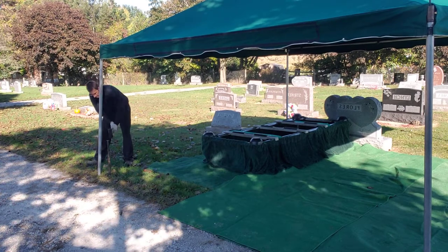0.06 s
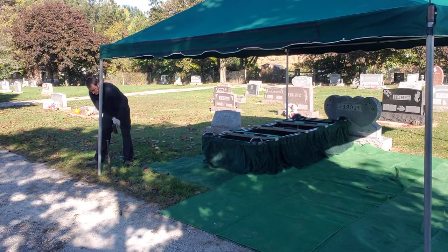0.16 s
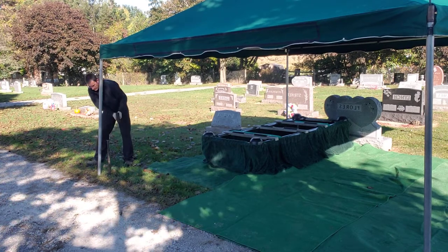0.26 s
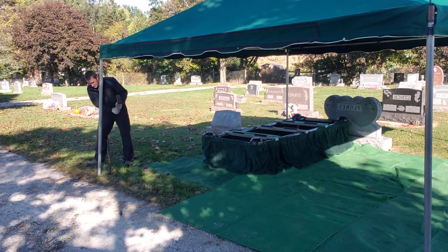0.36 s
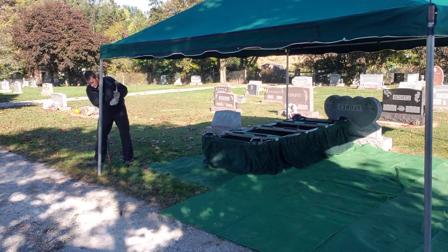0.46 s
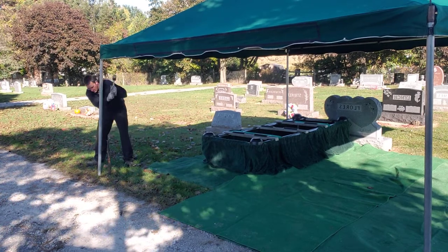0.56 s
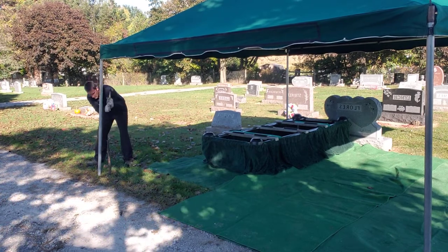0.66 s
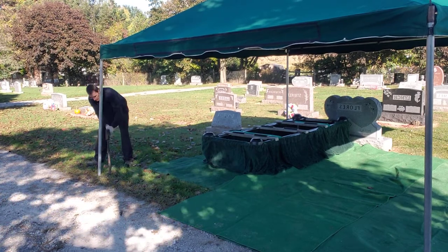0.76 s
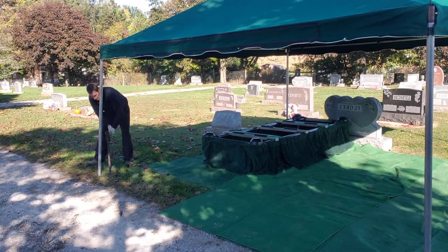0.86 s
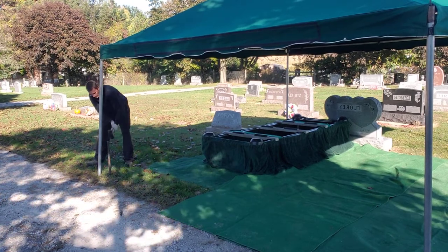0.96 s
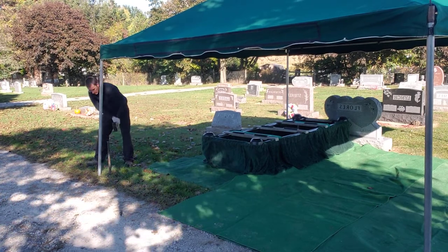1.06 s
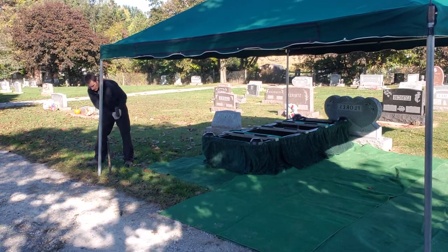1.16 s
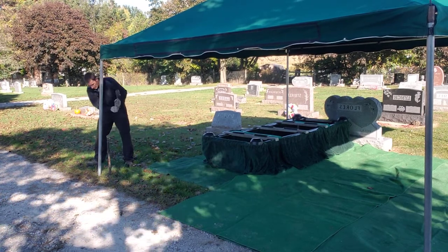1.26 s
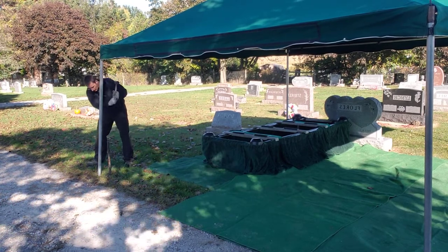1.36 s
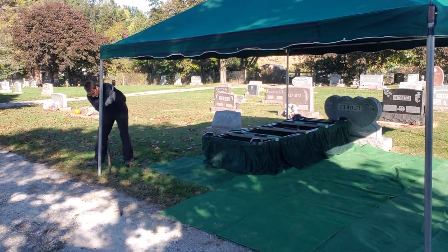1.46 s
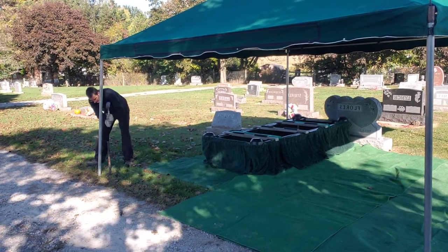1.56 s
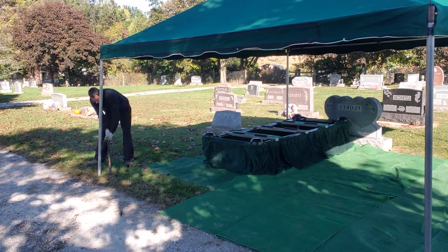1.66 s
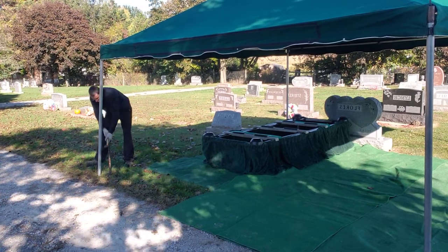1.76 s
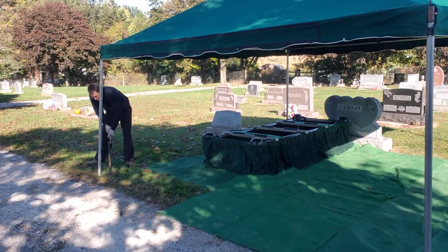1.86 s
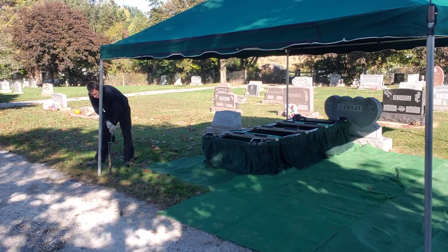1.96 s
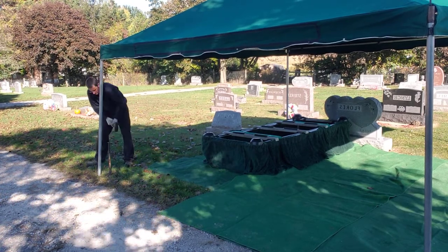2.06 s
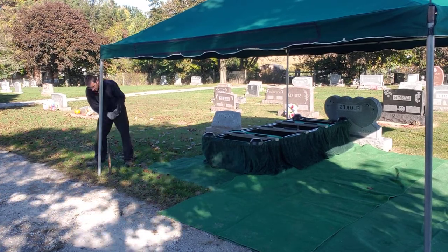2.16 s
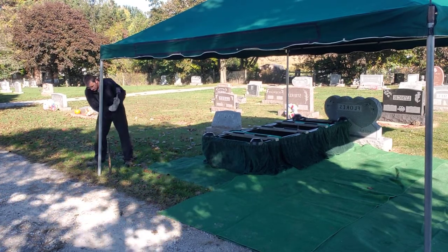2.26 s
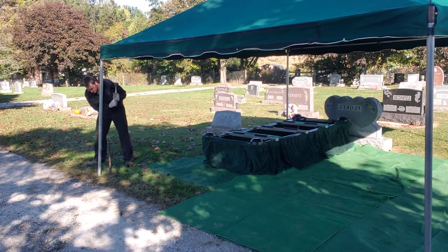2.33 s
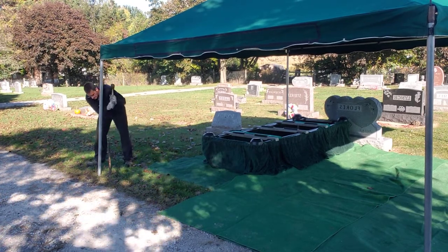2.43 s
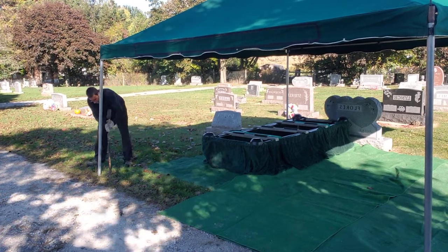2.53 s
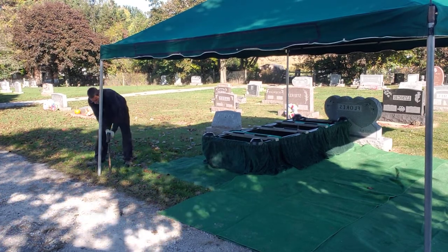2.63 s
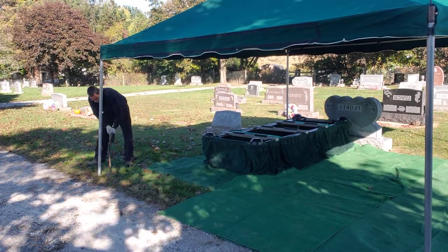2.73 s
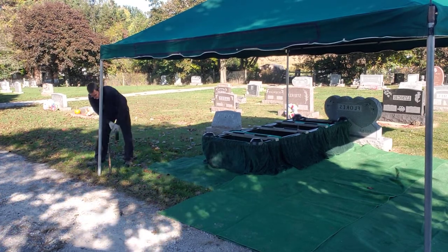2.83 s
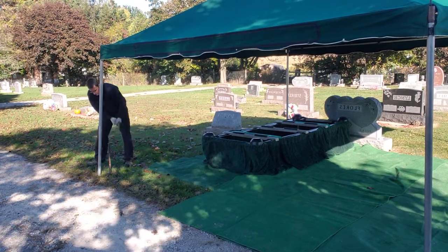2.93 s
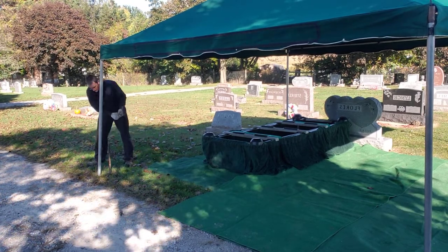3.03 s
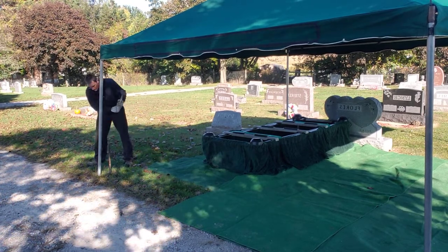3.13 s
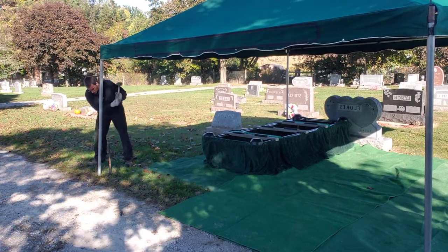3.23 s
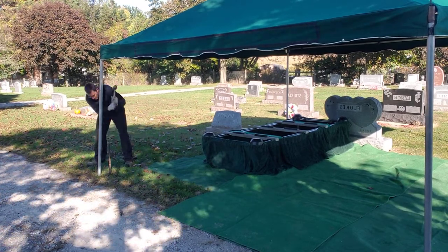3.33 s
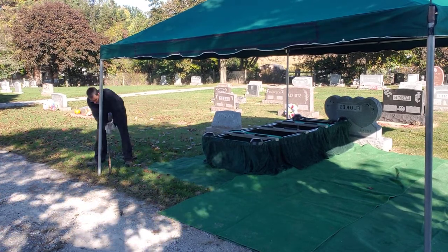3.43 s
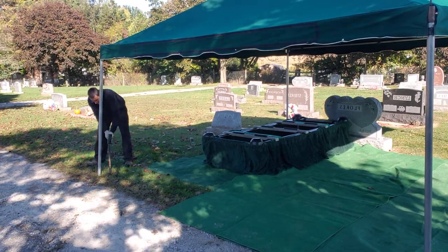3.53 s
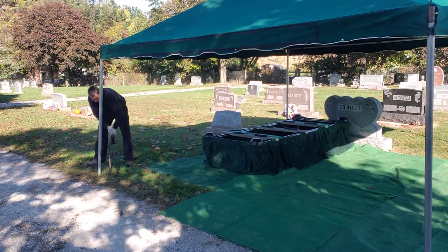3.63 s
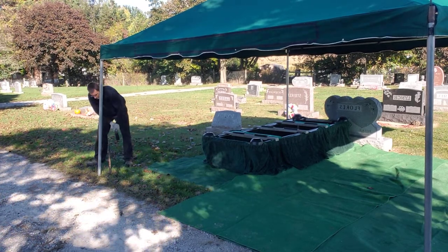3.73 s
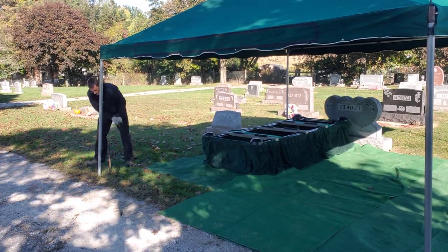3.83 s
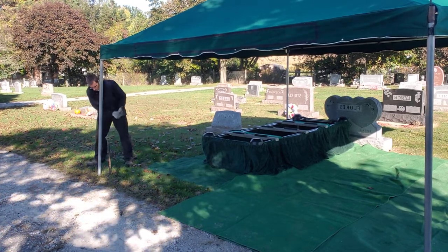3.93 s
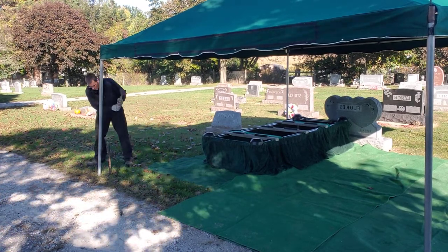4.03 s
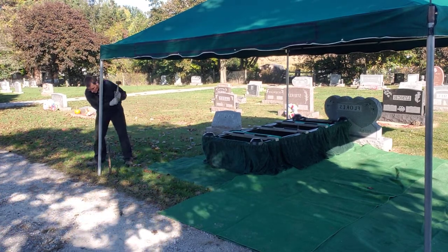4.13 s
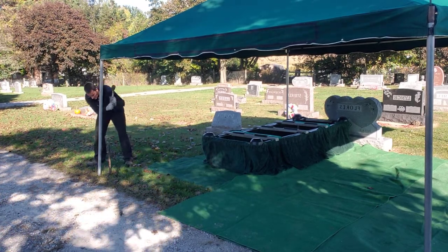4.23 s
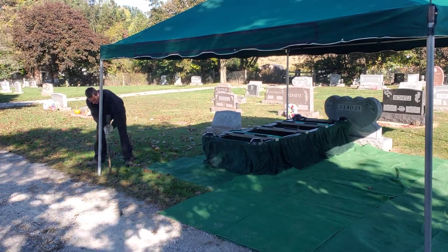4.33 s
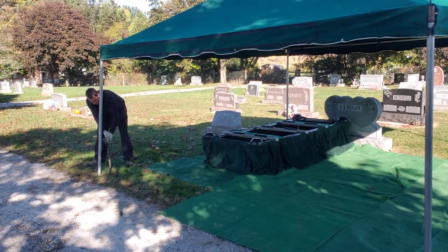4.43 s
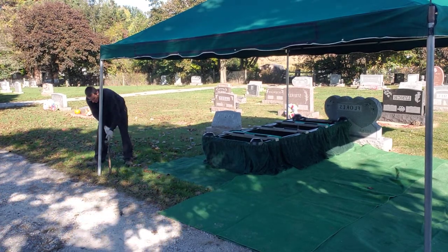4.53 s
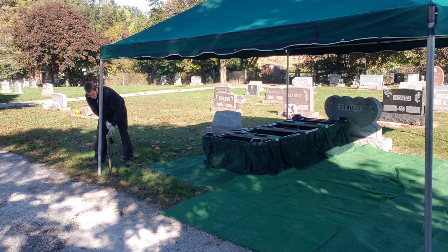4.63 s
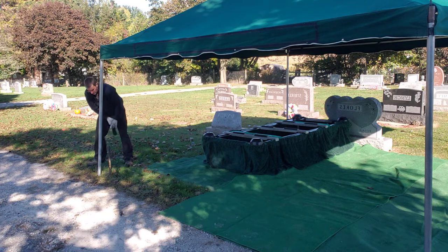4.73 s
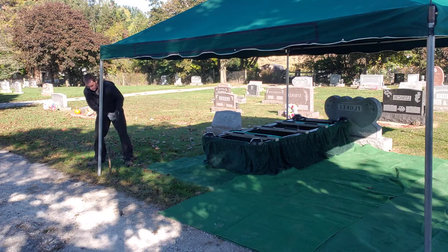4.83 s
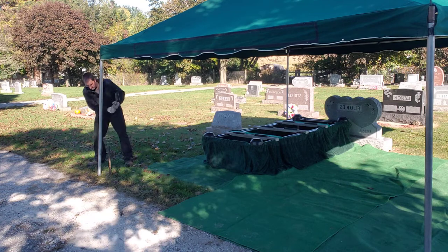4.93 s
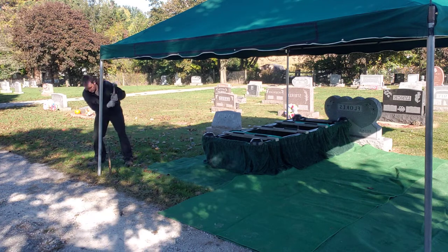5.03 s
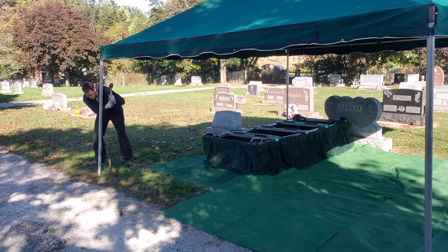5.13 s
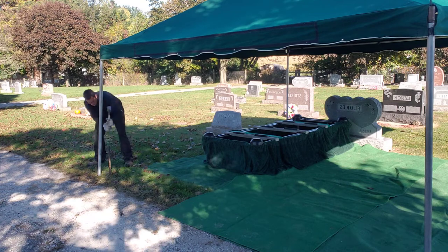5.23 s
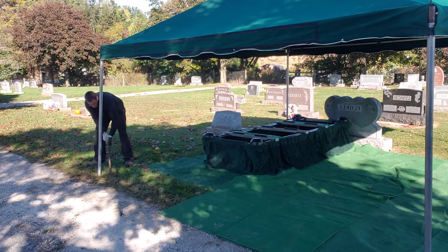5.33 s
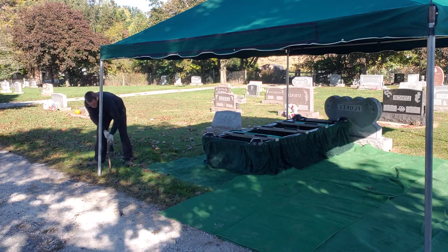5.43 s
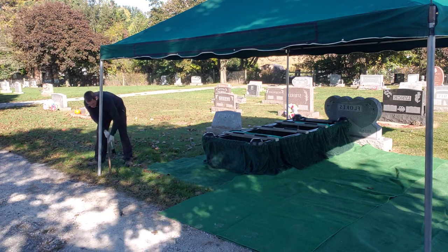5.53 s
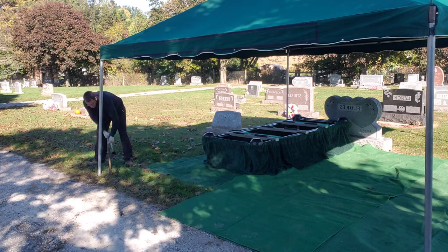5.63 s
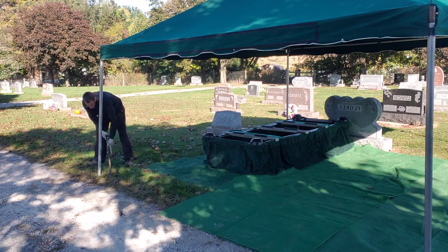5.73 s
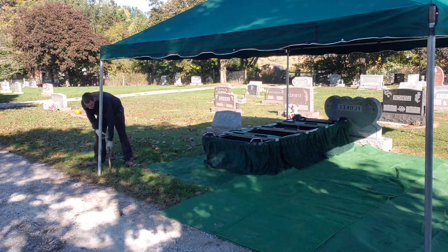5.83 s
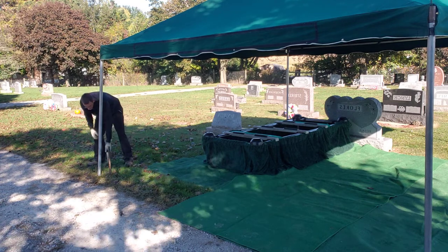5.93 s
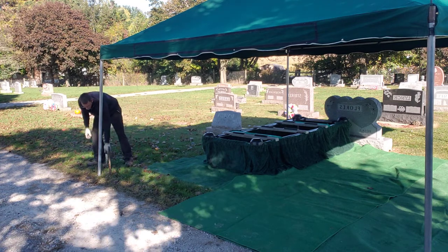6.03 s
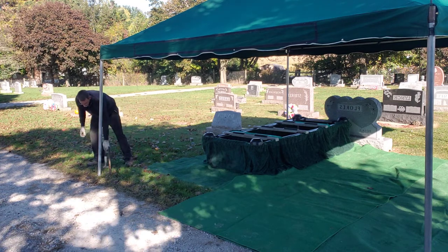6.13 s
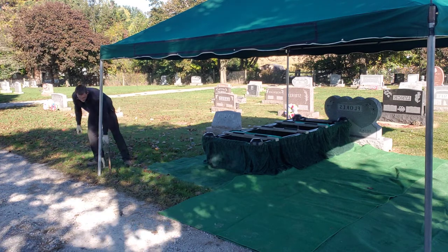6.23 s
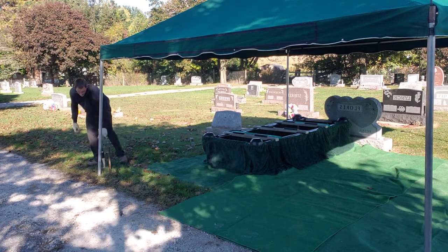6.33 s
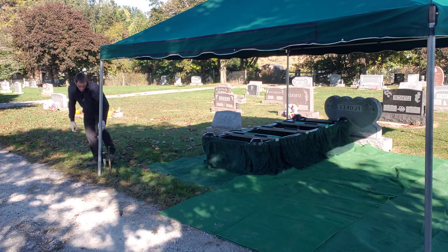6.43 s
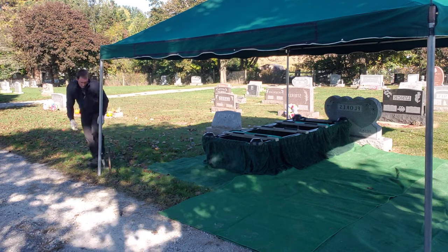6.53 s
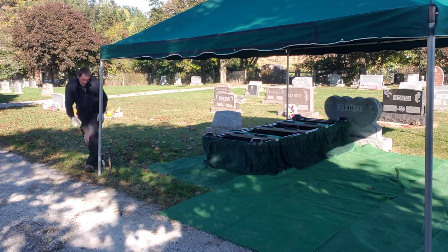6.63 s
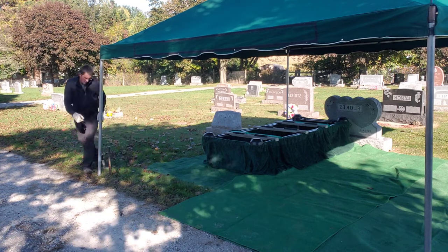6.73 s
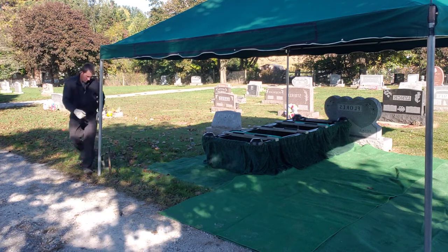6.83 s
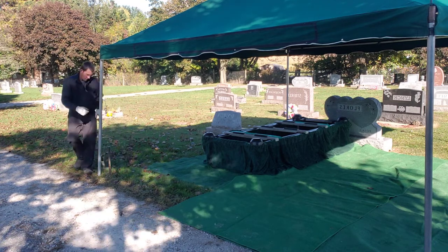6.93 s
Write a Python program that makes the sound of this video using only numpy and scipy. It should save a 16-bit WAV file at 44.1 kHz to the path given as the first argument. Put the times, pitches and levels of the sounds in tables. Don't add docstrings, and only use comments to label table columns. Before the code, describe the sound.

Steady hammer blows crack on a metal stake outdoors, each ringing briefly and echoing, while wind buffets the microphone with low rumbles.

```python
import sys
import numpy as np
from scipy import signal
from scipy.fft import rfft, irfft, next_fast_len
from scipy.io import wavfile
from scipy.ndimage import uniform_filter1d

SR = 44100
rng = np.random.default_rng(int(sys.argv[2]) if len(sys.argv) > 2 else 0)


def volts(x):
    e = np.asarray(x, float) / 20
    return 10 ** e


def pcm_store(signal):
    levels = np.round(np.clip(np.atleast_2d(signal), -1, 1) * 32767)
    wavfile.write(sys.argv[1], SR, levels.astype(np.int16).T)


N = 308242

# (frequency [Hz], level [dB])
CRACK_COLOUR = [(60, -12), (150, 6), (400, -12), (1000, 4.5), (2500, -6), (4500, -5.5), (7000, 3.5),
                (10000, -0.5), (14000, -17), (16500, -26)]
# (frequency [Hz], level [dB])
ECHO_RIGHT_COLOUR = [(60, 8), (150, 3.5), (400, -6), (900, 0.5), (2300, -4.5), (3200, -5), (4500, -0.5),
                     (6500, -4.5), (9500, -4.5), (13700, -2.5), (14500, -42), (16000, -67)]
FLUTTER_DB = 1.5


def unit(x):
    return x / np.sqrt(np.mean(x ** 2))


def noise(shape, size):
    hz, db = np.transpose(shape)
    fast = next_fast_len(size)
    log_hz = np.log(np.arange(1, fast // 2 + 2) * SR / fast)
    gain = volts(np.interp(log_hz, np.log(hz), db))
    white = rfft(rng.standard_normal(fast))
    return unit(irfft(white * gain, fast)[:size])


def walk(rate, size):
    hold = max(int(SR / rate), 1)
    steps = np.repeat(rng.standard_normal(size)[::hold], hold)
    return 1.14 * uniform_filter1d(uniform_filter1d(steps, hold), hold)[:size]


def fade(t, t60):
    return np.exp(-np.log(1000) * t / t60)


def ring(modes, t, scatter_db):
    total = 0
    for (hz, db, t60), (louder, sharper) in zip(modes, rng.standard_normal((len(modes), 2))):
        tone = np.sin(2 * np.pi * hz * (1 + 0.00316 * sharper) * t)
        total = total + volts(db + scatter_db * louder) * fade(t, t60) * tone
    return total


def band(x, lo_hz, hi_hz):
    return signal.sosfilt(signal.butter(2, (lo_hz, hi_hz), "band", fs=SR, output="sos"), x)


def add(out, s, sound):
    i = int(round(s * SR))
    part = sound[:, max(-i, 0):N - i]
    out[:, max(i, 0):max(i, 0) + part.shape[1]] += part


def scatter(t, colour, rise_s, hold_s, late_db):
    near = (1 - np.exp(-(t / rise_s) ** 2)) * fade(np.maximum(t - hold_s, 0), 0.24)
    far = volts(late_db) * fade(t, 0.61) * (t > rise_s)
    dull = [(hz, db - 1.1 * hz / 1000) for hz, db in colour]
    lumps = volts(1.7 * walk(220, len(t)))
    return lumps * (near * noise(colour, len(t)) + far * noise(dull, len(t)))


def hammer():
    # (time [s], straight to the right [dB], leak to the left [dB], echoes [dB], stake ring [dB])
    blows = [
        (-.03, -9, -40, -24, 3),
        (.845, -17, -17, -25, 0.5),
        (1.7, -20, -25, -27, -12),
        (2.653, -20.5, -32, -28, 3),
        (3.548, -20.5, -49, -29, 3.5),
        (4.443, -17.5, -42, -26.5, 3),
        (5.366, -19, -39, -26.5, 2.5),
    ]
    # (frequency [Hz], level [dB], decay t60 [s])
    stake_modes = [(2130, -18, .03), (2414, -14, 0.036), (2630, -16.5, .03), (3540, -12, 0.03),
                   (3590, 0, 0.045), (3655, 1, 0.045), (3800, -16, 0.02), (5160, -15.5, 0.02),
                   (6565, -13.5, 0.022), (7204, 1, 0.012), (9480, -7, .03), (10740, -4, .022),
                   (12200, -14, .015), (13500, -4, .02), (14280, -9, .015)]
    # (frequency [Hz], level [dB], decay t60 [s])
    stake_tail_modes = [(3581, -2, .5), (3625, -9, 1.1), (3655, 1, 1.05), (3700, -6, .35)]
    # (frequency [Hz], level [dB])
    echo_left_colour = [(80, -47), (250, -29.5), (600, -11.5), (1200, -10), (2300, 0), (2800, 1.5),
                        (3200, -13), (4500, 3.5), (5100, -5.5), (5700, -9), (6500, -0.5), (9500, -14),
                        (15000, -5), (15800, -52)]
    ground_modes = [(79.0, -14.0, 0.16), (116.0, -16, 0.078), (340, -17, 0.052)]  # Hz, dB, t60 s
    burst_s, left_lag_s = .0078, .004
    out, t = np.zeros((2, N)), np.arange(int(.6 * SR)) / SR
    for s, straight_db, leak_db, left_db, ring_db in blows:
        steel = volts(ring_db) * ring(stake_modes, t, scatter_db=FLUTTER_DB)
        crack = noise(CRACK_COLOUR, len(t)) * fade(t, 0.038) * np.minimum(t / 0.00083, 1)
        short_ring = steel * np.minimum(t / 0.0055, 1) * np.exp(-(t / burst_s) ** 4)
        thud = ring(ground_modes, t, scatter_db=FLUTTER_DB) * np.minimum(t / 0.0033, 1)
        straight = crack + volts(5.5) * short_ring + thud
        leak = ring([(9160, 0, .5)], t, scatter_db=0) * np.exp(-((t - .002) / .0012) ** 2)

        kick = volts(-23) * steel
        kick[0] += 1
        late_t = np.maximum(t - left_lag_s, 0)
        echo_left = scatter(late_t, echo_left_colour, 0.004, 0.023, -13.5)
        left = signal.fftconvolve(kick, echo_left)[:len(t)]
        kick[0] += volts(-2)
        echo_right = scatter(t, ECHO_RIGHT_COLOUR, 0.0044, 0.017, -18.0)
        right = signal.fftconvolve(kick, echo_right)[:len(t)]

        song = volts(ring_db - 27.0) * ring(stake_tail_modes, t, scatter_db=FLUTTER_DB) * np.minimum(t / 0.02, 1)
        right = volts(left_db - 14.5) * (right + song)
        left += volts(10) * np.roll(short_ring, int((left_lag_s + .002) * SR))
        left = volts(left_db) * (left + song) + volts(4.5) * band(right, 243, 1400)
        add(out, s, np.array([volts(leak_db) * leak + left, volts(straight_db) * straight + right]))
    return out


def gusts():
    # (start [s], hold [s], windward right [dB], sheltered left [dB])
    gust_list = [(-.1, .15, -31, -41.5), (0.39, 0.32, -32, -45), (1.05, 0.093, -41.5, -57.5),
                 (1.52, 0.032, -50.5, -76), (1.69, 0.086, -50, -72), (2.004, 0.18, -49.5, -84),
                 (3.55, 0.11, -53, -73), (4.15, 0.18, -56.5, -77), (4.976, 0.47, -45, -65.5),
                 (5.654, 0.24, -51, -68.5), (6.03, 0.23, -48.5, -78), (6.562, 0.59, -49, -71)]
    calm_db, rise_db_s, fall_db_s = (-62, -80), 176, 33.5
    t = np.arange(N) / SR
    db = np.array(calm_db)[:, None] + 0 * t
    for s, hold_s, *top_db in gust_list:
        rise_db = np.minimum(rise_db_s * (t - s), 0)
        fall_db = fall_db_s * np.maximum(t - s - hold_s, 0)
        db = np.maximum(db, np.array(top_db)[:, None] + rise_db - fall_db)
    return db


def wind():
    # (frequency [Hz], level [dB per Hz])
    rumble_colour = [(20, -34), (35, 3), (55, 7), (90, 0), (150, -15), (250, -41), (400, -32), (1500, -91)]
    # (frequency [Hz], level [dB per Hz])
    edge_colour = [(40, -39), (100, 2), (170, -2.5), (280, -13.5), (450, -23), (900, -32), (2500, -95)]
    # (time [s], level [dB], frequency [Hz])
    eddies = [(0.053, -23, 75), (0.224, -24, 61), (0.325, -24.5, 98), (.409, -16, 85), (0.445, -18.5, 89.5),
              (0.519, -16, 92), (0.59, -18.5, 80), (.674, -18, 89), (.708, -21, 72), (0.753, -19.5, 87),
              (0.816, -22.5, 89), (.935, -25.5, 84), (1.126, -30.5, 62), (1.179, -27.5, 79.5),
              (1.787, -31.5, 61.5), (2.023, -35, 62.6), (2.15, -34.5, 63.6), (2.21, -33, 67.6),
              (2.265, -30.5, 58.4), (4.228, -42, 61.6), (4.995, -29.5, 60.5), (5.034, -33, 70.6),
              (5.088, -35, 60), (5.119, -32.5, 77), (5.307, -33, 56), (5.849, -35, 66.5),
              (6.344, -36.5, 63.8), (6.668, -32.5, 63.6), (6.752, -43, 65), (6.851, -38, 65)]
    eddy_lee_db = -19
    out, level_db = np.zeros((2, N)), gusts()
    for side, rumble_db, edge_db in zip(out[::-1], level_db, (17, 34)):
        lumps_db = rumble_db - 1 + 2.5 * np.clip(walk(22, N), -2.5, 1.5)
        side += volts(lumps_db) * noise(rumble_colour, N)
        side += volts(lumps_db + 0.68 * rumble_db + edge_db - 1.5) * noise(edge_colour, N)
    t = np.arange(-.06, .06, 1 / SR)
    for (s, db, hz), turn in zip(eddies, rng.random((len(eddies), 2))):
        cycles, turn = hz * t, turn[:, None]
        body = np.exp(-(cycles / 0.8) ** 2) * np.cos(2 * np.pi * (cycles + turn))
        edge = np.exp(-(cycles / 0.46) ** 2) * np.cos(2 * np.pi * (2.0 * cycles + turn))
        right_db, left_db = level_db[:, int(s * SR)]
        peak_db = np.array([[db + left_db - right_db + eddy_lee_db], [db]]) - 1.5
        add(out, s + t[0], volts(peak_db) * (body + volts(0.79 * peak_db + 5.5) * edge))
    return out


def air():
    # (frequency [Hz], level [dB per Hz])
    traffic_colour = [(40, -14), (100, -30), (220, -17), (400, -7), (600, 0), (1000, -0.5), (1600, -2.5),
                      (2500, -2), (4000, -8), (6500, -13), (7600, -18), (9000, -27.5)]
    # (frequency [Hz], level [dB per Hz])
    road_colour = [(40, 6.5), (200, -10.5), (430, -21.5), (680, -7.5), (1000, -15.5), (1400, -17),
                   (2000, -37.5), (4000, -42), (7000, -46), (9000, -38.5)]
    # (frequency [Hz], level [dB per Hz])
    leaf_colour = [(2000, -18), (6000, 7), (9500, 1.5), (11000, 7.5), (13000, 1), (15600, 6), (16000, -19)]
    # (time [s], half length [s], over the hiss [dB], over the traffic [dB])
    rustles = [
        (1.196, 0.1, 1, 1),
        (3.4, 0.098, 7.5, 1.5),
        (4.153, 0.18, 6, 1.5),
        (5.05, .15, 3, 2),
        (6.0, 0.085, -3, 0.5),
        (6.327, .07, 12.5, 0.5),
        (6.728, 0.074, -1, 2.5),
    ]
    # (time [s], level [dB])
    far_machine = [
        (0, -76),
        (1.1, -69),
        (2.3, -66),
        (3.4, -62),
        (3.9, -65),
        (4.3, -60),
        (4.7, -72.5),
        (5.7, -85),
        (6.5, -74.5),
        (6.99, -73),
    ]
    t = np.arange(N) / SR
    machine_db = np.interp(t, *np.transpose(far_machine))
    rustle_db, swell_db = sum(np.outer(db, np.exp(-((t - s) / half_s) ** 2)) for s, half_s, *db in rustles)

    left = noise(traffic_colour, N) * volts(-51.5 - 0.64 * t + swell_db + .8 * walk(5.5, N))
    roar = np.hypot(volts(-64.5), volts(machine_db + 0.5))
    right = noise(road_colour, N) * roar * volts(4.5 + 1.2 * walk(2.5, N))
    common = volts(0.5) * band(right, 296, 540)

    leaves = []
    # level at the start [dB], level at rest [dB], settling time [s], share of the rustles
    for start_db, end_db, settle_s, share in ((-58.5, -84, 3.8, 1), (-64.5, -84, 4.1, .25)):
        hiss_db = end_db + (start_db - end_db) * np.exp(-t / settle_s) + share * rustle_db
        leaves.append(volts(hiss_db) * noise(leaf_colour, N))

    whine_db = machine_db - 2.0 + 4 * walk(40, N)
    whine_hz = 666 + 4 * walk(40, N)
    whine = np.sqrt(2) * volts(whine_db) * np.sin(2 * np.pi * np.cumsum(whine_hz) / SR)
    return np.array([left + common, right]) + np.array(leaves) + volts(np.array([[-1.5], [1.5]])) * whine


def pole():
    # (time [s], left [dB], right [dB], pitch [Hz], decay t60 [s])
    knocks = [(1.701, 4, -27, 2330, .015), (1.703, -17, -34, 6400, .04), (1.702, -22, -24, 9450, .06),
              (1.719, -20, -28, 2300, .015), (1.735, -18, -30, 3500, .015), (1.738, -20, -17, 4000, .015),
              (1.741, -19, -30, 4084, .06), (1.742, -29, -38, 4336, .15), (1.74, -24, -33, 3404, .15),
              (1.747, -19, -28, 2300, .03), (1.753, -20, -28, 3400, .03), (1.76, -18, -28, 2500, .02),
              (1.772, -18, -30, 3400, .02), (1.768, -39, -39, 345, .12)]
    # (frequency [Hz], level [dB], decay t60 [s])
    tube_modes = [(2870, -14, .8), (2910, -5, .9), (2940, -15, .6), (3040, -14, .35), (3104, -1, .35),
                  (3140, -4, .3), (3183, -1, .35), (3230, -6, .25), (3404, -8, .3), (3690, -8, .22),
                  (4084, -14, .25)]
    # (frequency [Hz], level [dB])
    clank_colour = [(150, -23), (500, -19.5), (1300, -6.5), (2300, -1), (3500, -1.5), (4500, -12.5),
                    (6500, -23), (9500, -15.5), (14000, -22), (15800, -47)]
    out, t = np.zeros((2, N)), np.arange(int(.7 * SR)) / SR
    for s, left_db, right_db, hz, t60 in knocks:
        modes = [(hz, 0, t60), (min(1.6 * hz, 12500), -9, t60)]
        knock = ring(modes, t, scatter_db=0.0) * np.minimum(t / 0.0018, 1)
        left = volts(-24.5) * scatter(t, clank_colour, 0.0015, 0.00078, -6.0)
        right = volts(-1) * noise(CRACK_COLOUR, len(t)) * fade(t, 0.032)
        right += volts(-22) * scatter(t, ECHO_RIGHT_COLOUR, .002, 0.0035, -9)
        add(out, s, volts(np.array([[left_db], [right_db]])) * (knock + np.array([left, right])))
    tube = []
    for db in (-24.5, -33):
        beating = volts(db + FLUTTER_DB * walk(60, len(t)))
        tube.append(beating * ring(tube_modes, t, scatter_db=FLUTTER_DB))
    cloth = np.exp(-(t / 0.4) ** 4)
    add(out, 1.757, np.array(tube) * np.minimum(t / 0.0053, 1) * cloth)
    return out


def scene():
    return hammer() + wind() + air() + pole()


def top_cut(x):
    return signal.sosfilt(signal.butter(12, 16880, fs=SR, output="sos"), x)


def record(dry):
    notch = signal.ellip(3, 1, 21, (7480, 8950), "bandstop", fs=SR, output="sos")
    top = signal.ellip(8, .2, 70, 16600, fs=SR, output="sos")
    bottom = signal.butter(2, 35, "high", fs=SR, output="sos")
    mix = signal.sosfilt(np.vstack([notch, top, bottom]), dry)
    return top_cut(mix)


dry = scene()
out = record(dry)
pcm_store(out)
```